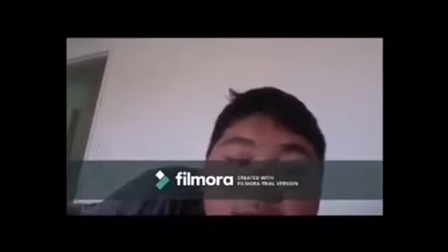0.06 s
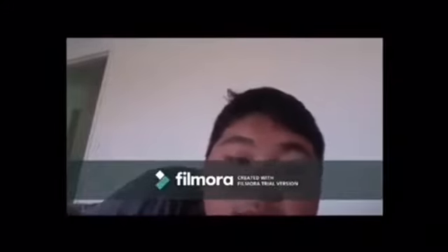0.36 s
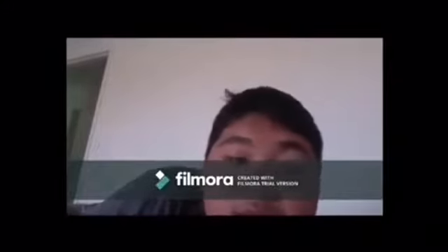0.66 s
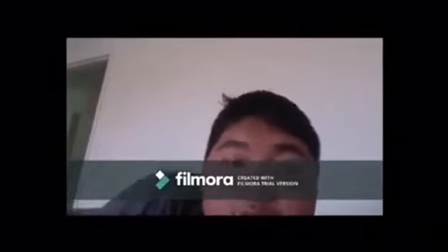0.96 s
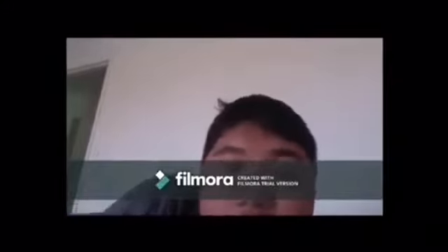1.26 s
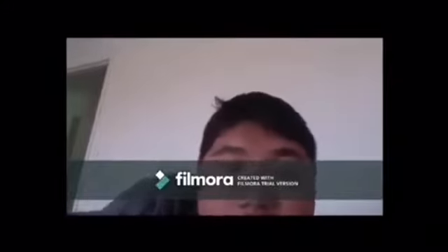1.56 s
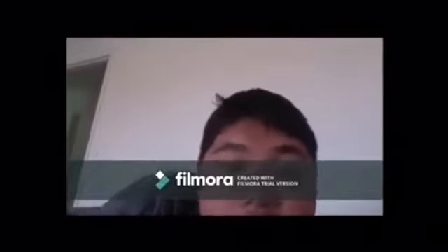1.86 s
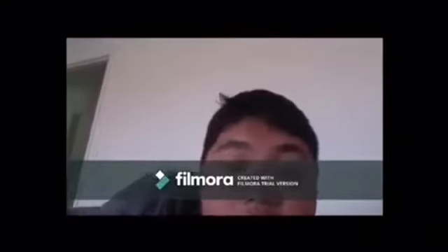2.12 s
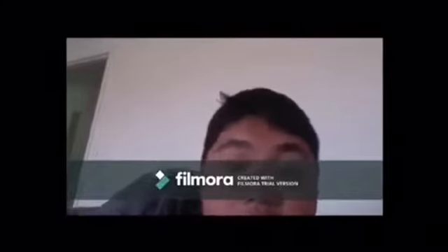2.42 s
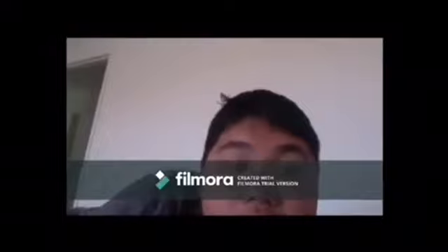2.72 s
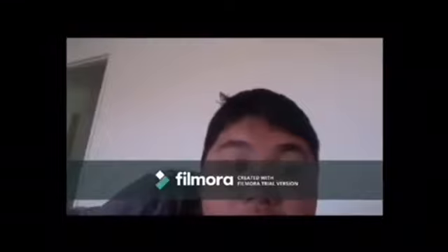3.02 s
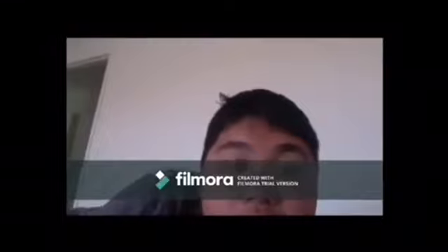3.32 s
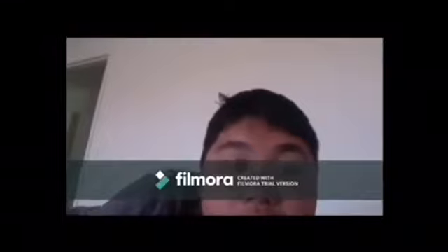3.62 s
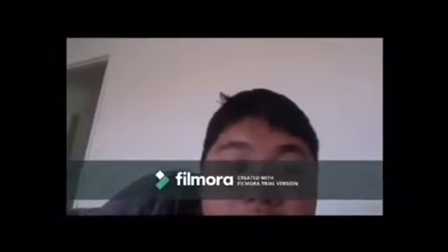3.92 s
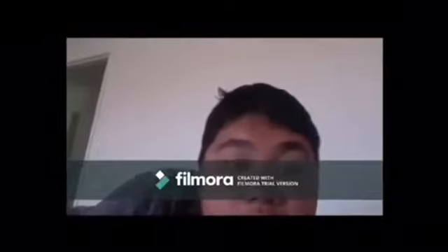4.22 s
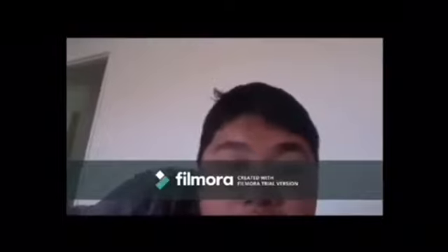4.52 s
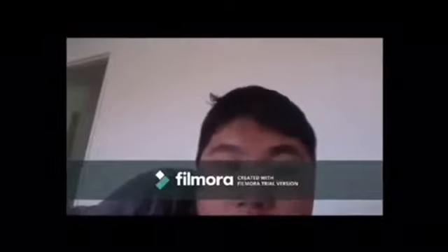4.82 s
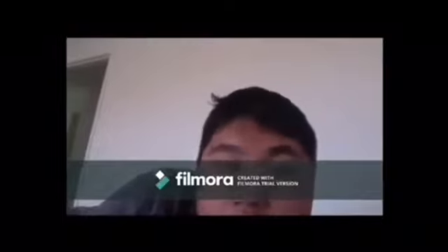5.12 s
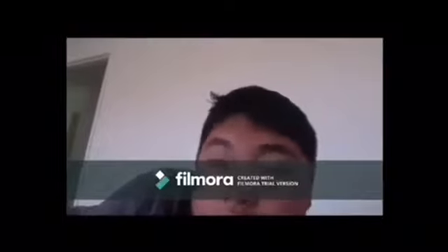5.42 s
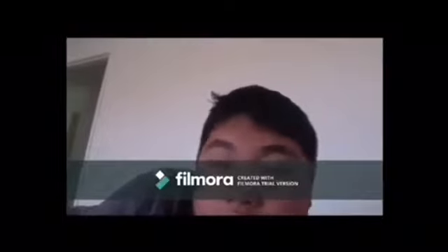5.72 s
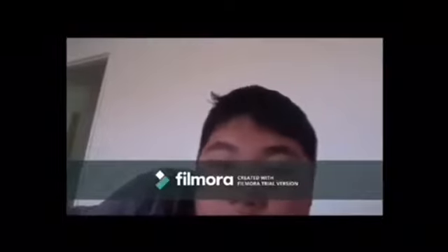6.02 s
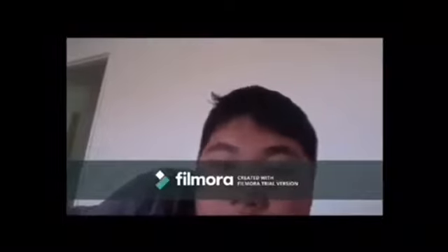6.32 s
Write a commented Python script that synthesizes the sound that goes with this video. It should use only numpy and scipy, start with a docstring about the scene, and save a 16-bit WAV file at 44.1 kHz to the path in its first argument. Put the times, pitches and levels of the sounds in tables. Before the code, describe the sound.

A soft, steady hiss with a faint fan whine fills a small room throughout. For the first second and a half or so, a distant bird quietly repeats a three-note phrase about twice a second. At 0.8 and 0.9 seconds, two firm thumps land on a tablet, right beside its own microphone. Light touches follow, thickening from 1.8 to 2.5 seconds into a quick, uneven run of nail ticks on glass, knocks on the case and dull fingertip thumps, with a few tiny skin squeaks. After a short lull, a second run starts at 3 seconds and ends in a sharper knock near 3.9. From 4.2 to 4.5 seconds a finger slides faintly over the glass with thin, high squeaks and a soft bump. Only the hiss and fan remain until one firm knock at about 5.7 seconds, then the room is quiet again.

```python
"""A steady hiss and a faint fan whine fill a small room; far off, a bird repeats a three-note phrase.
Then fingers tap and handle a tablet right beside its own microphone: nails tick on the glass,
firmer knocks ring the case and soft fingertips thump the body.
Skin squeaks where it catches on the glass, and one finger slides over it."""
import sys
import numpy as np
from scipy import signal
from scipy.fft import rfft, irfft
from scipy.io import wavfile
from scipy.ndimage import uniform_filter1d

SR = 44100
rng = np.random.default_rng(int(sys.argv[2]) if len(sys.argv) > 2 else 0)


def unload_wav(signal):
    """Save mono or channel-first audio to the path in sys.argv[1] as 16-bit WAV at rate SR, clipped to [-1, 1]."""
    wavfile.write(
        sys.argv[1],
        SR,
        np.round(np.clip(np.atleast_2d(signal).T, -1, 1) * 32767).astype(np.int16),
    )


N = 289547
TIME = np.arange(N) / SR
RING = np.arange(int(.25 * SR)) / SR  # time within one short sound, s


def undb(db):
    """Decibels to gain."""
    return 10 ** (np.asarray(db) / 20)


def unit(x):
    """Scale to rms 1."""
    return x / np.sqrt(np.mean(x ** 2))


def fade(t60):
    """Exponential decay that loses 60 dB in t60 seconds."""
    return np.exp(-np.log(1000) * RING / max(t60, 1e-4))


def swell(peak_s, order):
    """A contact that builds up to 1 at peak_s and dies away; a higher order is more compact."""
    age = RING / max(peak_s, 1e-4)
    return (age * np.exp(1 - age)) ** order


def add(track, s, sound):
    """Mix a sound in at time s."""
    i = max(int(s * SR), 0)
    track[i:i + len(sound)] += sound[:max(N - i, 0)]


def blow(x, db, window_s=.005):
    """Give a blow the energy of level db held for window_s."""
    return x * undb(db) * np.sqrt(window_s * SR / np.sum(x ** 2))


def resonate(x, hz, width_hz, widen):
    """Two resonances in series; the second, widen times as wide, steepens the skirts."""
    hz = min(hz, SR / 2 - 1000)
    for width in width_hz, widen * width_hz:
        x = signal.lfilter(*signal.iirpeak(hz, hz / width, fs=SR), x)
    return x


def colour(x, points):
    """Shape a sound by a spectrum of (f/Hz, level/dB) points."""
    hz, db = np.transpose(points)
    bins = np.maximum(np.fft.rfftfreq(len(x), 1 / SR), 1)
    return irfft(rfft(x) * undb(np.interp(np.log(bins), np.log(hz), db)), len(x))


def walk(rate):
    """Smooth random wander of spread 1, changing rate times a second."""
    k = max(int(SR / rate), 1)
    steps = np.repeat(rng.standard_normal(N // k + 1), k)
    return unit(uniform_filter1d(steps, k)[:N])


def tone(hz):
    """A sine that follows a pitch curve."""
    return np.sin(2 * np.pi * np.cumsum(hz) / SR)


# spectrum of the room's hiss: f/Hz, relative density/dB
HISS_SPECTRUM = [(24, -61), (40, -26.5), (177, 1), (211, -2.5), (502, -7.5), (582, -4), (693, -8),
                 (746, -4), (910, -3), (1610, -4), (2150, -5), (2600, -11), (3470, -14), (4300, -19),
                 (5200, -19.5), (6600, -19.5), (7800, -21.5), (9100, -27), (9900, -28), (15000, -50.5)]
# broad resonances in the hiss: f/Hz, width/Hz, relative level/dB
HISS_PEAKS = [(188, 130, -24), (1290, 2000, -15), (3325, 1020, -7)]
# the fan's tones, faint behind the hiss: f/Hz, relative level/dB
FAN_TONES = [(735, -15.5), (1378, -16.5), (1562, -13.5), (1746, -15.5)]
# rise and fall of hiss and fan at the microphone: t/s, gain/dB
ROOM_TONE_GAIN = [(0.0, -48.5), (0.66, -51.5), (0.84, -51), (0.97, -49.5), (1.3, -50.5), (1.86, -48),
                  (2.01, -47.5), (2.67, -48.5), (2.87, -51), (3.05, -50.5), (3.42, -48), (3.8, -48),
                  (4.08, -49), (4.42, -47), (4.75, -50), (5.1, -52), (5.54, -54.5), (5.87, -53),
                  (6.57, -55)]


def hiss_and_fan(hiss_db=-1.5, flicker_db=.45):
    """Room tone: a slightly flickering hiss and a wavering fan whine swell and sink together."""
    hiss = undb(hiss_db) * unit(colour(rng.standard_normal(N), HISS_SPECTRUM))
    for hz, width, db in HISS_PEAKS:
        hiss += undb(db) * unit(resonate(rng.standard_normal(N), hz, width, widen=1))
    fan_speed = 1 + 0.0012 * walk(6)
    whine = sum(undb(db) * unit(tone(hz * fan_speed) * (1 + 0.39 * walk(17))) for hz, db in FAN_TONES)
    hiss *= undb(flicker_db * walk(12))
    return (hiss + whine) * undb(np.interp(TIME, *np.transpose(ROOM_TONE_GAIN)))


# the distant bird's notes: peak t/s within the phrase, length/s, base level/dB, start f/Hz, end f/Hz,
# roughness/share of the pitch
BIRD_NOTES = [(-.006, 0.048, -59.5, 4300, 4450, .035), (0.032, 0.021, -47, 2880, 2720, .03),
              (0.199, 0.0663, -55.5, 2712, 2280, 0.16)]
# its phrases: t/s, lift of the high note/dB, of the chirp/dB, of the falling note/dB
BIRD_PHRASES = [(-.091, 2, 0, 7.5), (0.385, -3, 5.5, 4.5), (.893, 8, -6, 1.5), (1.405, -5, 0, 6.5)]


def bird(rise_share=0.48, scatter_t60=0.09, scatter_db=-2):
    """Far off, twice a second: a thin high note, a chirp and a rough falling note, blurred by echoes."""
    song = np.zeros(N)
    for start_s, *lifts_db in BIRD_PHRASES:
        for (after_s, length_s, db, start_hz, end_hz, rough), lift_db in zip(BIRD_NOTES, lifts_db):
            along = 2 * (TIME - start_s - after_s) / length_s  # 0 at the note's peak
            hz = np.interp(along, [-1, 1], [start_hz, end_hz])
            shape = np.exp(-np.where(along < 0, (along / rise_share) ** 2, along))
            song += undb(db + lift_db) * shape * unit(tone(hz * (1 + rough * walk(900))))
    scatter = rng.standard_normal(len(RING)) * fade(scatter_t60)
    scatter /= np.sqrt(np.sum(scatter ** 2))
    return song + undb(scatter_db) * signal.fftconvolve(song, scatter)[:N]


# resonances of the tablet's glass: f/Hz, width/Hz, relative energy/dB
GLASS_MODES = [(4320, 710, 0), (5300, 820, 2.5), (6720, 660, -8), (7160, 630, -4), (8330, 560, -5.5),
               (9960, 1300, -3.5), (10500, 670, -4.5), (11700, 1400, -6.5), (14300, 2100, -10.5)]


def glass(contact, low_db, high_db, touch, uneven_db=3, detune=0.022):
    """The glass rings; the spot touched tilts its resonances, and each touch varies them a little."""
    ring = 0
    for k, ((hz, width, db), (weight, shift)) in enumerate(zip(GLASS_MODES, touch)):
        lift_db = np.interp(hz, [5500, 6400, 8500, 9700], [low_db, 0, 0, high_db])
        mode = resonate(contact, hz * (1 + detune * shift), width, widen=3)
        ring += (-1) ** k * blow(mode, db + lift_db + uneven_db * weight)
    return ring


def nail(contact, hz, second_hz, width_hz=390, second_db=-4.5):
    """A nail rings briefly at two pitches that change with how it lands."""
    first, second = (resonate(contact, f, width_hz, widen=4) for f in (hz, second_hz))
    return blow(first, 0) + blow(second, second_db)


# nails on the glass, close to the microphone: t/s, level/dB, lift of the low glass modes/dB, of the
# high ones/dB, slant (0 square-on, 1 glancing), nail f/Hz, second nail f/Hz, nail over glass/dB
NAIL_TICKS = [(.816, -40.5, -9, 6, 0.088, 8400, 10400, 4), (1.024, -56.5, -10, -14, .6, 8320, 9300, 1),
              (1.1253, -47, -2, -10, 0.05, 5320, 9900, 6), (1.482, -43, -17, -3, 0.52, 7750, 9060, -7),
              (1.565, -66, -15, 10, 0.72, 14000, 11900, 0), (1.727, -48.5, -14, 4, .38, 12100, 8740, 1),
              (1.8304, -40, -20, 3, .55, 7100, 6500, 4), (1.9142, -33, -12, 1, 0.68, 5980, 9800, -4),
              (1.9685, -48.5, -10, 0, .78, 7140, 11800, 2), (2.0177, -46, -14, -10, 0.27, 7000, 8700, 17),
              (2.1012, -42, 2, 8, 0.6, 11460, 9700, 0), (2.2184, -38, -22, 2, 0.42, 8600, 6870, 0),
              (2.2238, -39.5, -18, -2, .2, 9000, 7500, -3), (2.325, -41, -10, 6, 0.51, 7200, 10300, 3),
              (2.335, -47, -14, -14, 0.55, 6600, 7200, 8), (2.395, -39.5, -14, -6, 0.57, 7550, 6400, 7),
              (2.4862, -27, -10, 2, 0.29, 7520, 6720, 3.5), (2.4992, -44.5, -11, 1, 0.83, 6300, 7400, -1),
              (2.505, -48, -9, 0, 0.92, 5800, 7400, -6), (2.684, -51.5, -16, -20, 0.73, 7660, 7500, 9),
              (3.0456, -43.5, 0, 11, .25, 9600, 5660, 6), (3.144, -43, -22, -8, .3, 8300, 9000, 11),
              (3.1473, -43.5, -22, -2, .05, 8810, 7750, 9), (3.219, -38, -9, -3, 0.66, 6090, 5440, 6),
              (3.228, -54, -6, 0, .6, 6100, 11000, 0), (3.2905, -46, -3, 7, 1, 5960, 6700, 1.5),
              (3.407, -58, -10, -3, 0.47, 9900, 13000, 0), (3.495, -40, -18, 7, 0.47, 7200, 6400, 8),
              (3.542, -32, -16, -8, 0, 7600, 8500, 2), (3.6613, -41, -9, -5, 0.58, 7000, 7860, 2),
              (3.7381, -29.5, -9, -7, 0.25, 8200, 9460, 3), (3.851, -38, -16, -9, 0.52, 6500, 7500, -8),
              (3.855, -27, -19, 4, .62, 6500, 7640, -1.5), (5.745, -39, 0, -4, .1, 10030, 10700, 1)]


def ticks(grit=0.66, rise_share=0.39, scuff_s=0.0038, scuff_lead_s=0.0027, grain_db=6):
    """A nail scuffs the glass and lands with a tick; a glancing one touches longer and scuffs more."""
    out = np.zeros(N)
    n = len(RING) // 4
    for s, db, low_db, high_db, slant, hz, second_hz, nail_db in NAIL_TICKS:
        noise, scrape, grain = rng.standard_normal((3, n))
        touch = rng.standard_normal((len(GLASS_MODES), 2))
        contact_s = np.interp(slant, [0, 1], [.0006, .0018])
        peak_s = rise_share * contact_s
        landing = grit * noise * swell(peak_s, order=1)[:n]
        landing[int(peak_s * SR)] += 2  # the sharp impact
        scuff = scrape * undb(grain_db * grain) * swell(scuff_s, order=2)[:n]
        scuff_db = np.interp(slant, [0, 1], [-13, 5.5])
        for contact, lead_s, lift_db in (landing, 0, 0), (scuff, scuff_lead_s, scuff_db):
            ring = blow(glass(contact, low_db, high_db, touch), 0)
            ring += blow(nail(contact, hz, second_hz), nail_db)
            add(out, s - lead_s, blow(ring, db + lift_db))
    return out


# modes of the case around the microphone: f/Hz, t60/s, gain struck mid-case/dB, struck at the rim/dB
CASE_MODES = [(450, 0.019, -21, -20), (603, 0.012, -13, -3), (732, 0.018, -4, -13.5),
              (866, 0.024, -20, -10.5), (1135, 0.0098, -28, -5.5), (1284, 0.012, -31, 4.5),
              (1460, .013, -33, 1), (1740, 0.015, -7.5, -3.5), (2110, 0.0076, -35, 9),
              (3040, 0.019, -25, -16), (4090, 0.0081, -12, -3)]
# knocks on the case: t/s, level/dB, place (0 middle, 1 rim), low f/Hz and high f/Hz of the excited band
CASE_KNOCKS = [(0.8154, -28, 0.019, 300, 2920), (.907, -34.5, 0.13, 302, 1800), (1.83, -39, 1, 1900, 3500),
               (1.9784, -38.5, 1, 300, 900), (2.1048, -37, 0.76, 600, 2200),
               (2.223, -30.5, 0.92, 300, 1410), (2.326, -40, 0.79, 900, 4000),
               (2.486, -37, 0.67, 1200, 5000), (3.047, -44, 0.71, 400, 1100), (3.5422, -45, 1, 1400, 5000),
               (3.856, -22.5, 0.9, 300, 5030), (5.7456, -28, 0.049, 300, 3200)]


def knocks(contact_s=0.00065, detune=0.0045):
    """The place struck picks the case's modes; a soft finger omits the high, a light nail the low."""
    out = np.zeros(N)
    for s, db, place, low_hz, high_hz in CASE_KNOCKS:
        shifts = rng.standard_normal(len(CASE_MODES))
        ring = 0
        for (hz, t60, middle_db, rim_db), shift in zip(CASE_MODES, shifts):
            gain = undb(np.interp(place, [0, 1], [middle_db, rim_db]))
            gain /= np.sqrt(1 + (hz / high_hz) ** 6 + (low_hz / hz) ** 6)
            ring += gain * fade(t60) * np.sin(2 * np.pi * hz * (1 + detune * shift) * RING)
        attack = 1 - np.exp(-RING / contact_s)
        add(out, s, blow(ring * attack, db))
    return out


# low modes of the tablet's body, rung by every thump: f/Hz, t60/s, relative level/dB
BODY_MODES = [(142, .11, -40), (192, .095, -28)]
# fingertips on the held body, right at the microphone: t/s, level/dB, f/Hz at the widest swing,
# time to that swing/s, pitch sag/octaves (negative rises), t60/s, back cover over body/dB
FINGER_THUMPS = [(0.816, -20, 242, 0.0065, -0.065, 0.023, -20),
                 (0.9062, -17.5, 227, 0.0053, 0.59, 0.027, -22),
                 (1.2874, -43.5, 198, 0.0094, 0.42, .024, -10), (1.435, -31, 196, 0.0093, 0.8, .02, -20),
                 (1.4813, -41.5, 187, 0.008, 2, 0.088, -24), (1.6493, -43, 186, 0.0098, 0.63, .039, -19),
                 (1.7396, -41, 179, 0.0062, 1.1, 0.043, -20), (1.832, -41.5, 315, 0.0082, -0.19, .031, -21),
                 (1.9138, -24.5, 214, 0.0075, -0.49, 0.052, -28),
                 (1.9755, -28.5, 198, 0.0065, 1.05, 0.043, -12),
                 (2.1044, -26.5, 218, 0.0093, 1.47, 0.035, -17),
                 (2.2205, -20.5, 211, 0.0066, -0.38, 0.022, -7),
                 (2.2393, -32.5, 135, 0.006, -0.041, 0.05, -18),
                 (2.3215, -30, 200, 0.006, -0.58, 0.034, -16),
                 (2.39, -40.5, 250, 0.0098, 0.69, 0.079, -10.5), (2.496, -26, 217, 0.012, -0.47, 0.06, -28),
                 (3.0466, -27, 184, 0.0077, 1.28, 0.041, -16.5), (3.1334, -45, 142, 0.014, 0.9, .07, -12),
                 (3.2256, -39, 133, 0.013, -0.51, .062, -22), (3.29, -28, 197, 0.0063, -0.83, 0.035, -18),
                 (3.3416, -43.5, 145, 0.0102, .66, .04, -11),
                 (3.4084, -40.5, 181, 0.0076, 0.043, .027, -17),
                 (3.4998, -25.5, 172, 0.0081, 0.052, 0.056, -19),
                 (3.589, -43, 160, 0.0055, 1.3, 0.063, -16), (3.6497, -47, 186, 0.013, 1.2, .07, -13),
                 (3.7433, -30.5, 184, 0.0059, 1.06, .039, -3.5),
                 (3.8564, -25.5, 201, 0.0059, 0.89, 0.035, -16),
                 (3.8612, -32.5, 270, 0.012, 0.47, 0.11, -17),
                 (4.3066, -36.5, 192, 0.0048, 1.6, 0.033, -25), (4.3287, -36.5, 194, 0.0051, 1.4, .02, -13),
                 (5.7454, -18.5, 240, 0.0062, 0.33, .031, -17.5)]


def thumps(back_hz=390, sag_s=.012, fully_loaded_hz=111):
    """A soft fingertip swings the body and its back cover for a few cycles; the low modes follow."""
    out = np.zeros(N)
    low_modes = sum(undb(db) * fade(t60) * np.sin(2 * np.pi * hz * RING) for hz, t60, db in BODY_MODES)
    for s, db, hz, peak_s, sag, t60, back_db in FINGER_THUMPS:
        age = RING - peak_s
        decay = np.interp(age, RING, fade(t60), left=0)
        shape = np.maximum(swell(peak_s, order=4), decay)
        # a finger that stays down loads the body and the pitch sags; one that springs off lets it rise
        pitch = np.maximum(hz * 2 ** (-sag * np.tanh(age / sag_s)), fully_loaded_hz)
        cycles = np.cumsum(pitch) / SR
        swing = np.sin(2 * np.pi * (cycles - np.interp(0, age, cycles)))
        back = undb(back_db) * np.sin(2 * np.pi * back_hz * age)
        after_ring = np.interp(age, RING, low_modes)
        add(out, s, blow(shape * (swing + back) + after_ring, db))
    return out


# skin catching on the glass, close up: peak t/s, length/s, level/dB, f/Hz
SKIN_SQUEAKS = [(1.795, .012, -51.5, 6200), (1.925, 0.011, -37, 5600), (2.39, 0.014, -44, 7350),
                (3.815, 0.0067, -47, 8100), (4.19, .06, -63, 13050), (4.252, .05, -63, 13000),
                (4.26, .035, -62, 9600), (4.32, 0.045, -57, 12800), (4.365, .04, -66, 13100),
                (4.415, .022, -51, 8900), (4.432, .02, -56, 9300), (4.465, .045, -66, 12800),
                (6.542, 0.059, -62, 13000)]


def squeaks(rough=0.0165, wander=0.0053):
    """Thin, short, unsteady squeaks of skin sticking and slipping on the glass."""
    out = np.zeros(N)
    middle_s = RING.mean()
    for s, length_s, db, hz in SKIN_SQUEAKS:
        shape = np.exp(-(2 * (RING - middle_s) / length_s) ** 2)
        pitch = hz * (1 + rough * walk(980) + wander * walk(49.5))[:len(RING)]
        add(out, s - middle_s, undb(db) * shape * tone(pitch))
    return out


# one finger stroking the glass, faint even this close: t/s, hold/s, level/dB
FINGER_STROKES = [(1.862, 0.055, -64), (4.167, 0.075, -72), (4.25, 0.22, -64), (4.39, .045, -67)]


def slide(lowest_hz=6000, top_hz=13300, tilt_db_per_octave=-1, grain_db=2.5,
          slip_chance=0.014, slip_size=4, attack_s=0.026, release_s=0.027):
    """Skin rubs the glass's high modes in many tiny slips; each stroke swells, holds and lets go."""
    friction = rng.standard_normal(N)
    slips = rng.random(N) < slip_chance * undb(4 * walk(300))  # slips come in clusters
    friction *= 1 + slip_size * slips
    rub = 0
    for hz, width, db in GLASS_MODES:
        if hz > lowest_hz:
            mode = unit(resonate(friction, hz, width, widen=2))
            tilt_db = tilt_db_per_octave * np.log2(hz / lowest_hz)
            rub += mode * undb(db + tilt_db + grain_db * walk(110))
    rub = signal.sosfilt(signal.butter(8, top_hz, fs=SR, output="sos"), unit(rub))
    out = np.zeros(N)
    for s, hold_s, db in FINGER_STROKES:
        pressure = np.interp(TIME - s, [-attack_s, 0, hold_s, hold_s + release_s], [0, 1, 1, 0])
        out += pressure * undb(db) * rub
    return out


# what the small room's walls return to the microphone: f/Hz, gain/dB
WALL_SPECTRUM = [(80, -5.5), (200, -17), (500, -16.5), (1500, -21), (4000, -14.5), (6500, -15),
                 (8200, -18.5), (10000, -17.5), (14000, -11)]


def room(x, t60=0.15, echo_s=0.01, echo_db=-23):
    """A near surface throws back one echo, and the walls add a short tail."""
    onset = np.clip(RING / echo_s - .5, 0, 1)
    tail = rng.standard_normal(len(RING)) * fade(t60) * onset
    response = colour(tail / np.sqrt(np.sum(tail ** 2)), WALL_SPECTRUM)
    response[int(echo_s * SR)] += undb(echo_db)
    return x + signal.fftconvolve(x, response)[:N]


def scene():
    """Mono, from the tablet itself: fingers up close, room tone behind, the bird in the distance."""
    direct = hiss_and_fan() + slide()
    echoing = room(thumps() + knocks() + ticks() + squeaks() + bird())
    return (direct + echoing)[None]


def record(dry, bass_hz=55, treble_hz=15000, cutoff_hz=15300):
    """The tablet's small microphone loses the deep bass and the top."""
    thin = signal.sosfilt(signal.butter(2, bass_hz, "high", fs=SR, output="sos"), dry)
    dull = signal.sosfilt(signal.butter(4, treble_hz, fs=SR, output="sos"), thin)
    return signal.sosfilt(signal.ellip(8, .2, 70, cutoff_hz, fs=SR, output="sos"), dull)


dry = scene()
out = record(dry)
unload_wav(out)
```